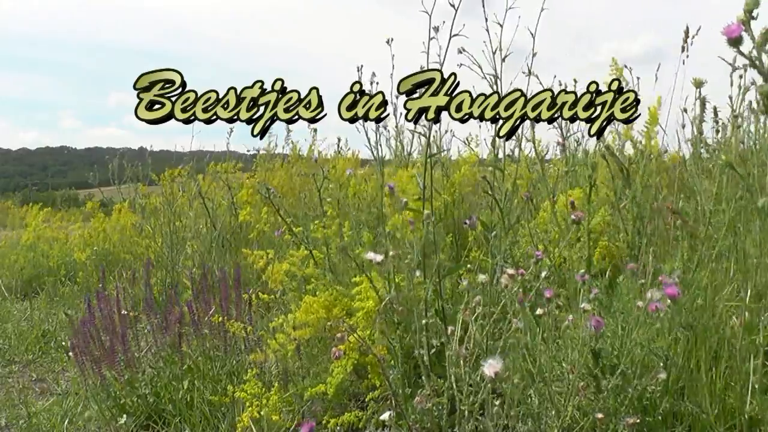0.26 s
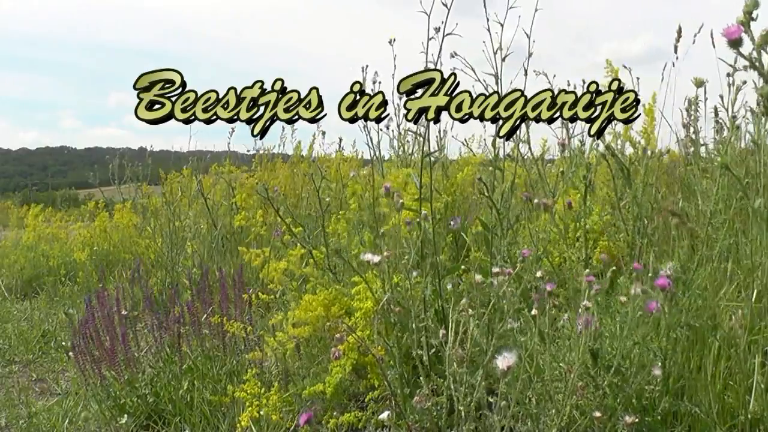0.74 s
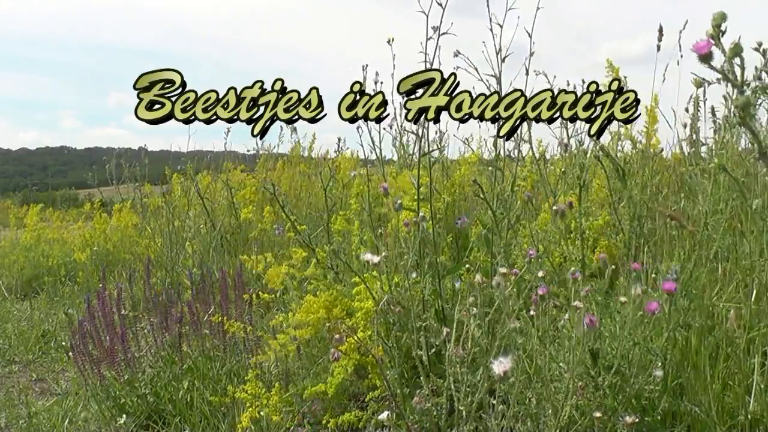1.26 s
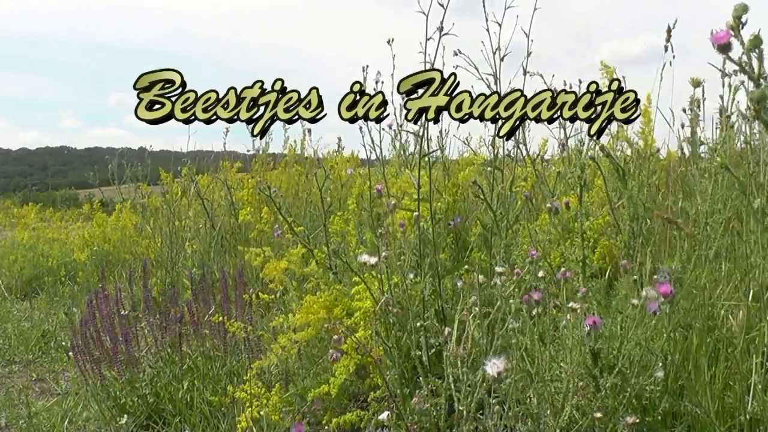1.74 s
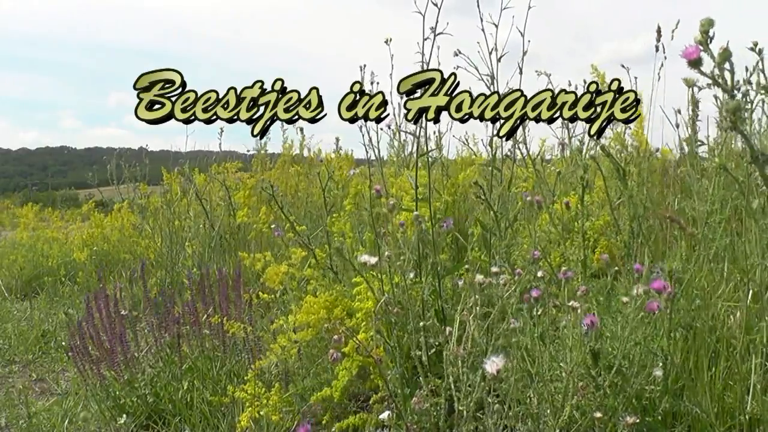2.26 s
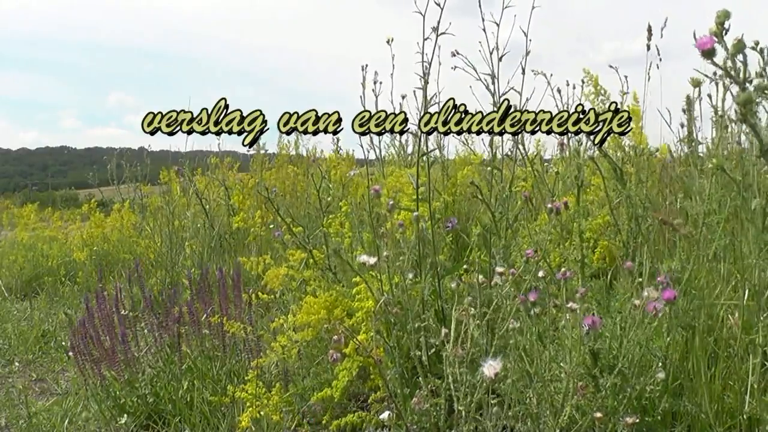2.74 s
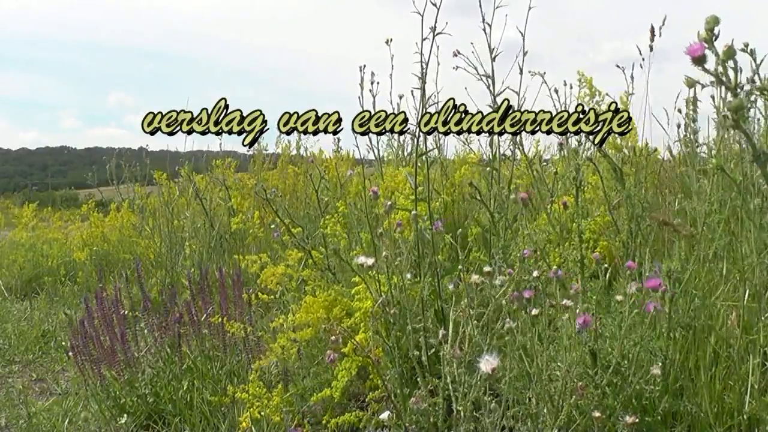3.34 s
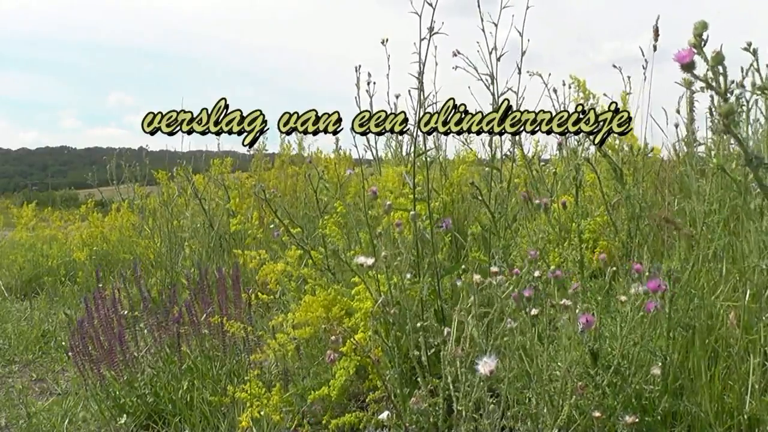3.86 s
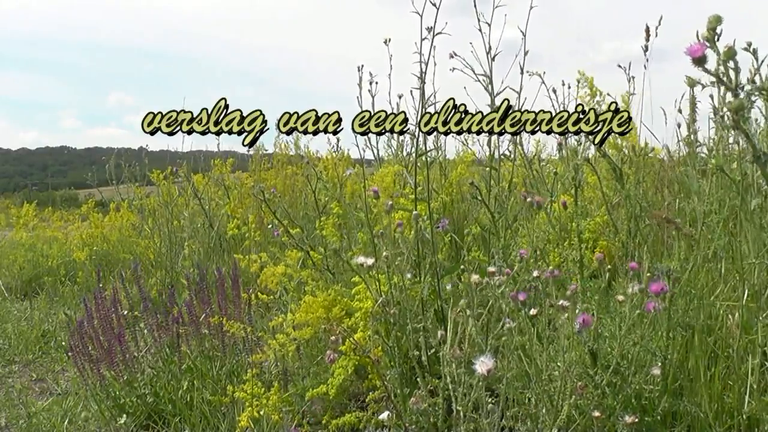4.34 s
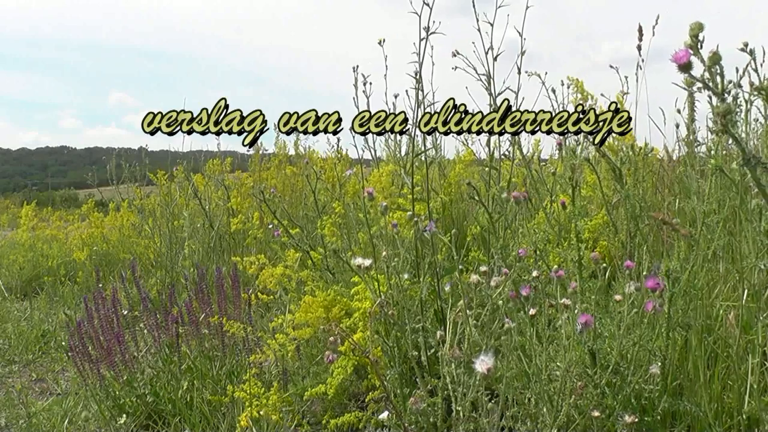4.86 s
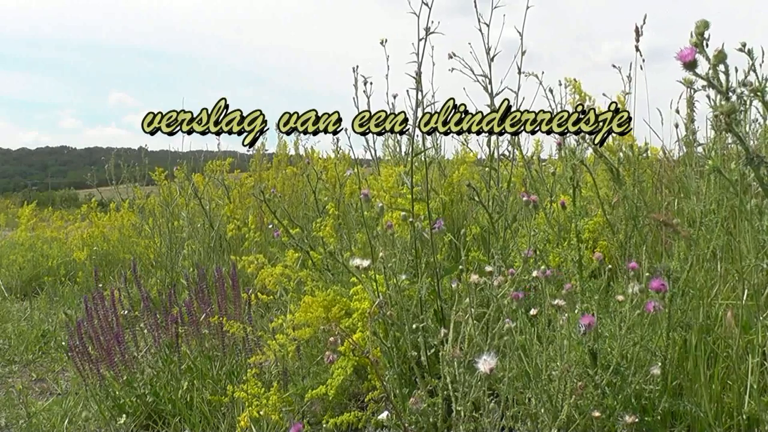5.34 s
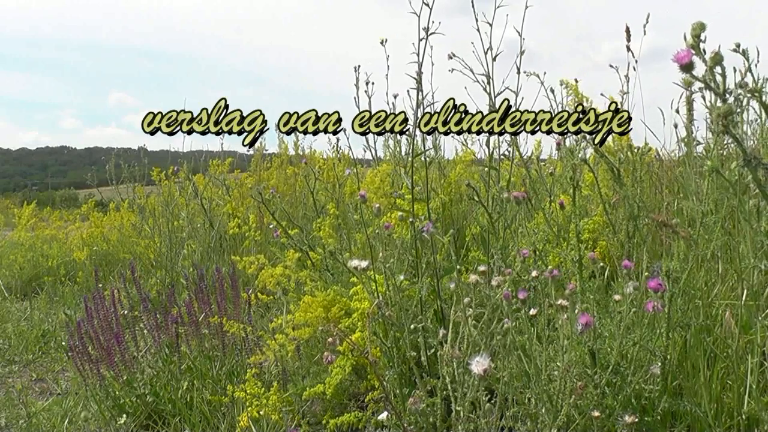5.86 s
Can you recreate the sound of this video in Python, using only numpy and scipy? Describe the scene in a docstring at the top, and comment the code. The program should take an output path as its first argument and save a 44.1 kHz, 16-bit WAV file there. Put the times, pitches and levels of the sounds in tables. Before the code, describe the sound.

A calm open meadow with very soft airy hiss and a blurred far chorus of birds. A turtle dove dominates with frog-like purrs, smooth hoots around 550 Hz pulsing about 28 times a second, each pulse arching in pitch. Purrs run at 0.15-0.7, 1.1-1.7, 2.2-3.0, 3.35-3.9 and 4.3-4.85 seconds; the first is strongest, the third starts low and soft and swells. A soft low gulp falls at 3.0-3.15. A last, far weaker purr runs from 5.4 to 6.07. Behind, a small bird repeats short falling chirps from 0.7 to 1.95, alongside a winding warble and thin whistles. Birds thin out after 2 seconds; quick descending notes come near 3.5-3.9, harsh scolding cheeps at 4.1-4.6, buzzy twits at 5.1-5.35, then faint twittering. Barely audible ticks occur at 0.13 and 2.62. Slight close reflections; all fades by 6.1.

```python
"""Small birds chirp over a blurred far chorus, then a turtle dove purrs six frog-like croaks, the last faint.
A croak is one nearly pure tone swelled into hoots, hurried at first, near 28 a second; each arches in pitch.
A soft gulp of moving partials falls between two croaks. Birds are gliding sines, some buzzy or harsh.
Coloured noise makes the meadow air, decaying steps two faint ticks; all fades at the end."""
import sys
import numpy as np
from scipy import signal
from scipy.io import wavfile
from scipy.ndimage import uniform_filter1d

SR = 44100
rng = np.random.default_rng(int(sys.argv[2]) if len(sys.argv) > 2 else 0)


def store_wav(level_fs):
    """Save 16-bit WAV to argv[1]."""
    pcm = np.round(np.clip(np.atleast_2d(level_fs), -1, 1) * 32767)
    wavfile.write(sys.argv[1], SR, pcm.T.astype(np.int16))


N = 268622
TIME_S = np.arange(N) / SR


def gain_of(db):
    """Decibels to amplitude."""
    return 10 ** (np.asarray(db) / 20)


def evened(x):
    """Scales to rms 1."""
    return x / np.sqrt(np.mean(x ** 2) + 1e-20)


def along(rows, t, axis=1):
    """Reads one column of a curve at the times t."""
    columns = np.transpose(rows)
    return np.interp(t, columns[0], columns[axis])


def read(points, hz):
    """Reads a spectrum on a log-frequency axis."""
    f, value = np.transpose(points)
    return np.interp(np.log(hz + 1), np.log(f + 1), value)


def add(mix, s, sound):
    """Mixes a sound in at time s."""
    part = mix[max(round(s * SR), 0):][:len(sound)]
    part += sound[:len(part)]


def sine(hz):
    """Sine that follows a pitch curve."""
    return np.sin(2 * np.pi * np.cumsum(hz) / SR)


def wander(n, hz):
    """Random drift of rms 1, up to about hz changes a second."""
    return evened(np.interp(np.arange(n) / SR * hz, np.arange(4096), rng.standard_normal(4096)))


def band(x, lo_hz, hi_hz, order=4):
    """Band-pass filter that adds no delay."""
    return signal.sosfiltfilt(signal.butter(order, [lo_hz, hi_hz], "band", fs=SR, output="sos"), x)


def noise(spectrum, patchy_db):
    """Noise of a given colour with drifting patches, rms 1."""
    hz = np.fft.rfftfreq(2048, 1 / SR)
    a, b, patches = rng.standard_normal((3, N // 512 + 5, len(hz)))
    patches = uniform_filter1d(patches, size=7, axis=0)
    patches = evened(uniform_filter1d(patches, size=14, axis=1))
    z = (a + 1j * b) * gain_of(read(spectrum, hz) + patchy_db * patches)
    return evened(signal.istft(z.T, nperseg=2048, noverlap=1536)[1][:N])


# meadow reverberation: f/Hz, t60/s
MEADOW_T60 = [(500, 0.71), (3000, 0.21), (8000, 0.38)]


def meadow(x, onset_s=0.0036):
    """Scatter from plants and far trees: a diffuse tail whose decay time depends on frequency."""
    hz, t, z = signal.stft(rng.standard_normal(SR), SR, nperseg=256)
    decay = gain_of(-60 * t / read(MEADOW_T60, hz)[:, None])
    onset = 1 - np.exp(-t / onset_s)
    tail = signal.istft(z * decay * onset, SR, nperseg=256)[1]
    return signal.fftconvolve(x, tail / np.linalg.norm(tail))[:N]


# hiss colour: f/Hz, relative density/dB per Hz
AIR_COLOUR = [(25, -11), (60, -7.5), (130, -13.5), (250, -2.5), (400, 12.5), (800, 8), (1200, 3.5),
              (1900, -2), (3500, 0.5), (5000, -9), (6500, -21.5), (8500, -27.5), (10000, -36),
              (15000, -37.5)]
# hiss within 1300-2400 Hz: t/s, level/dB
AIR_LEVEL = [(0, -69), (2.1, -69.5), (2.35, -68), (3.1, -72), (3.9, -72.5), (4.5, -71.5), (5.1, -75),
             (5.5, -81.5), (5.85, -88.5), (6.09, -101)]


def air():
    """Soft hiss of the open field, its level set by its middle band."""
    hiss = noise(AIR_COLOUR, patchy_db=2.5)
    middle = signal.sosfilt(signal.butter(4, [1300, 2400], "band", fs=SR, output="sos"), hiss)
    return hiss / middle.std() * gain_of(along(AIR_LEVEL, TIME_S))


# wash colour: f/Hz, relative density/dB per Hz
WASH_COLOUR = [(150, -52), (320, -20.5), (420, -6), (520, 9), (650, -1), (800, -11), (1100, -8.5),
               (1600, -32), (4000, -67)]
# wash: t/s, level/dB
WASH_LEVEL = [(0, -58), (1, -58), (2, -67.5), (3.2, -59.5), (4.1, -59.5), (5, -65), (5.4, -74), (5.8, -72),
              (6.09, -79.5)]


def wash():
    """Low patchy noise under the birds."""
    return noise(WASH_COLOUR, patchy_db=2.5) * gain_of(along(WASH_LEVEL, TIME_S))


# clicks: t/s, peak/dB, thud level/dB
TICK_EVENTS = [(0.127, -40.5, -77), (2.6218, -35, -72)]


def ticks(decay_s=0.00054, thud_s=.014, thud_hz=220):
    """Tiny dry clicks: a sudden step that dies at once, and a soft low thud that peaks after it."""
    out, t = np.zeros(N), np.arange(8192) / SR
    for s, db, thud_db in TICK_EVENTS:
        rumble = evened(band(rng.standard_normal(len(t)), 40, thud_hz, order=2))
        thud = rumble * t / thud_s * np.exp(1 - t / thud_s)
        add(out, s, gain_of(db) * np.exp(-t / decay_s) + gain_of(thud_db) * thud)
    return out


# far chorus: t/s, level/dB
CHORUS_LEVEL = [(0, -61), (0.3, -65), (0.78, -58), (1.25, -58.5), (1.55, -59), (2.15, -58.5), (2.3, -69),
                (2.6, -74), (2.95, -67.5), (3.25, -72), (3.65, -78.5), (3.82, -58.5), (4, -70.5),
                (4.3, -71.5), (5, -70.5), (5.25, -67.5), (5.85, -82.5), (6.09, -89.5)]
# where its notes gather: t/s, f/Hz, spread/octaves
CHORUS_PITCH = [(0, 3570, 0.16), (.45, 3666, 0.23), (.56, 4414, 0.13), (.63, 4366, .14), (.75, 3614, 0.15),
                (.92, 3824, 0.14), (1.06, 3506, .16), (1.25, 3680, 0.11), (1.6, 3502, 0.15),
                (2.1, 3210, 0.16), (2.45, 3466, 0.24), (2.9, 3550, 0.17), (3.05, 4580, .08),
                (3.2, 4464, 0.091), (3.4, 3960, 0.13), (3.8, 3915, 0.13), (4.4, 3950, 0.27),
                (5.3, 3800, 0.24), (6.09, 3930, 0.11)]


def chorus(dry_db=-3, glide_oct=.16, note_s=.05, count=1700, note_spread_db=2.2):
    """Many gliding notes, blurred by distance, swell and sink together; outlying pitches are weaker."""
    out, u = np.zeros(N), np.linspace(-.5, .5, round(note_s * SR))
    for k, (late, high, slope, loud) in enumerate(rng.standard_normal((count, 4))):
        s = (k + late) / count * N / SR
        # sqrt 2 offsets the narrowing by the weaker outliers
        octaves = np.sqrt(2) * along(CHORUS_PITCH, s, axis=2) * high + glide_oct * slope * u
        hz = along(CHORUS_PITCH, s) * 2 ** octaves
        size = gain_of(note_spread_db * loud) * np.exp(-(high / 2) ** 2)
        add(out, s - note_s, size * np.hanning(len(u)) * sine(hz))
    far = meadow(out) + gain_of(dry_db) * out
    far /= np.sqrt(abs(uniform_filter1d(far ** 2, size=6000)) + 1e-9)  # level out before shaping
    return gain_of(along(CHORUS_LEVEL, TIME_S)) * far


def whistle(length_s, start, middle, end, db, buzz, buzz_hz=650, waver_hz=15):
    """A note that glides through three pitches in Hz; a buzzy one shakes fast in pitch."""
    u = np.linspace(0, 1, round(length_s * SR))
    hz = start * (1 - u) * (1 - 2 * u) + middle * (2 * u) * 2 * (1 - u) + end * u * (2 * u - 1)
    hz = hz + buzz_hz * buzz * wander(len(u), 1500) + waver_hz * wander(len(u), 380)
    return gain_of(db) * signal.windows.tukey(len(u), .45) * sine(hz)


# single calls: t/s, length/s, start f/Hz, middle f/Hz, end f/Hz, peak/dB, buzz/0-1
CALLS = [(0.002, 0.058, 4236, 3920, 3500, -58.5, 0.05), (0.06, 0.038, 3590, 3900, 3940, -58, 0),
         (0.202, 0.059, 4230, 3900, 3580, -58.5, 0), (0.43, 0.068, 3400, 3580, 3270, -54, 0.03),
         (0.293, 0.22, 5260, 5170, 5010, -68.5, 0.17), (0.522, 0.07, 4250, 4730, 5060, -60, 0.55),
         (0.548, 0.11, 5200, 5540, 5800, -72, 0.3), (0.588, 0.037, 3000, 3080, 3010, -53, 0.1),
         (0.631, .05, 4550, 4320, 4080, -66.5, 0.2), (0.978, 0.045, 4450, 4500, 4660, -58, 0.13),
         (1.356, 0.046, 3362, 3407, 3680, -50.5, 0.34), (1.608, 0.051, 3530, 3800, 4090, -55.5, 0.18),
         (1.787, 0.045, 4680, 5000, 5270, -66.5, .08), (2.336, 0.024, 3460, 2750, 2620, -51, 0.2),
         (2.76, 0.087, 5350, 4760, 4590, -60.5, 0.03), (2.871, 0.088, 5600, 7100, 5500, -76.5, 0.08),
         (2.876, 0.039, 3620, 3760, 3890, -60.5, 0.03), (2.984, 0.1, 5250, 4690, 4560, -64.5, 0.14),
         (3.594, 0.077, 3580, 3710, 3880, -59, 0.07), (3.947, 0.16, 6160, 6620, 6820, -74.5, 0.12),
         (4.126, .08, 2405, 3230, 3730, -66.5, 0.1), (4.214, 0.057, 2600, 3200, 3930, -61.5, 0.1),
         (4.258, 0.025, 3740, 4020, 4380, -51.5, 0), (4.295, 0.068, 3325, 3170, 3110, -64, 0.05),
         (4.731, 0.13, 3420, 3330, 3340, -63.5, 0.12), (5.455, 0.071, 3560, 3570, 3520, -70.5, 0),
         (4.298, 0.12, 1230, 1290, 1260, -63.5, 0.3), (4.548, 0.15, 1370, 1460, 1400, -66, 0.27),
         (5.707, 0.093, 1133, 1132, 1110, -71, 0.02)]


def calls():
    """Single whistled calls."""
    out = np.zeros(N)
    for s, *note in CALLS:
        add(out, s, whistle(*note))
    return out


# repeats: first t/s, notes, period/s, length/s, start f/Hz, middle f/Hz, end f/Hz,
# first level/dB, last level/dB, buzz/0-1
REPEATED_NOTES = [(0.122, 2, 0.22, 0.036, 4130, 3590, 3350, -55, -57, 0.02),
                  (0.169, 2, 0.26, 0.037, 3475, 3880, 4010, -57.5, -60.5, 0.1),
                  (0.865, 2, 0.34, 0.065, 4130, 4150, 4090, -57, -55, 0.12),
                  (2.112, 2, 0.139, 0.1, 7050, 6350, 4300, -70, -69, 0.05),
                  (2.219, 2, 0.11, 0.07, 1286, 1253, 1070, -61, -64.5, 0),
                  (2.41, 2, 0.09, 0.084, 1100, 1144, 1024, -66.5, -64.5, 0.07),
                  (2.219, 2, 0.083, 0.046, 1680, 1720, 1674, -68, -68, 0.03),
                  (2.74, 2, 0.098, 0.051, 1315, 1305, 1190, -62.5, -67.5, 0.08),
                  (3.487, 4, 0.115, 0.05, 5900, 4400, 3700, -58.5, -59.5, 0.1),
                  (3.724, 2, 0.2, 0.16, 8100, 8080, 7950, -81, -79, 0.25),
                  (4.765, 2, 0.16, 0.02, 4680, 5600, 6700, -70, -69.5, 0),
                  (5.408, 3, 0.194, 0.095, 4110, 4070, 4110, -70.5, -70, 0.02),
                  (5.487, 3, 0.206, 0.055, 3850, 3330, 2900, -69.5, -74, 0.13),
                  (5.578, 7, 0.0725, 0.03, 5650, 4850, 4000, -72.5, -82, 0.08)]


def phrases(stray=0.007):
    """Repeated whistles that swell or fade and stray a little in pitch."""
    out = np.zeros(N)
    for first, notes, period, length, start, middle, end, first_db, last_db, buzz in REPEATED_NOTES:
        for k, db in enumerate(np.linspace(first_db, last_db, round(notes))):
            glide = np.array([start, middle, end]) * (1 + stray * rng.standard_normal())
            add(out, first + k * period, whistle(length, *glide, db, buzz))
    return out


# falling notes: middle t/s, length/s, level/dB, f/Hz, glide/Hz per s
FALLING_NOTES = [(0.739, .032, -54, 2940, -9000), (0.877, 0.039, -54.5, 2904, -8000),
                 (1.012, 0.028, -51.5, 2840, -9000), (1.152, .042, -50.5, 2814, -11000),
                 (1.286, 0.043, -48.5, 2860, -7000), (1.415, 0.042, -50.5, 2840, -9000),
                 (1.544, .046, -48.5, 2850, -7000), (1.678, 0.038, -47.5, 2850, -7000),
                 (1.8, 0.044, -47, 2820, -6000), (1.94, 0.052, -47, 2873, -3000)]


def slurs(buzz=.06):
    """One bird repeats a short falling note that tends to grow longer, louder and flatter."""
    out = np.zeros(N)
    for s, length, db, hz, slope in FALLING_NOTES:
        fall = slope * length / 2
        add(out, s - length / 2, whistle(length, hz - fall, hz, hz + fall, db, buzz))
    return out


# scolding cheeps: t/s, length/s, level/dB, harshness/0-1
SCOLDS = [(4.121, 0.065, -67.5, 0.77), (4.21, 0.059, -65.5, 0.7), (4.314, 0.052, -65.5, 0.83),
          (4.4, .06, -67.5, 0.84), (4.507, 0.051, -66, .9), (4.579, .045, -68.5, 0.9)]
# fundamental: start f/Hz, end f/Hz
SCOLD_HZ = (842, 1016)
# partials without harshness: multiple, level/dB
SCOLD_PARTIALS = [(3, -9), (4, -5.5), (5, -12), (6, -10.5), (7, -11)]


def cheeps(shake=0.09, flatten=0.96, top_hz=6800, grain_db=5, grains_per_s=450):
    """A scolding bird: rising stacks of partials that break up; harsh ones shake and turn brighter."""
    out = np.zeros(N)
    for s, length, db, harsh in SCOLDS:
        n = round(length * SR)
        hz = np.geomspace(*SCOLD_HZ, n) * (1 + shake * harsh * wander(n, 1200))
        angle = 2 * np.pi * np.cumsum(hz) / SR
        envelope = gain_of(db) * signal.windows.tukey(n, .45)
        for k, level in SCOLD_PARTIALS:
            grain = evened(gain_of(grain_db * wander(n, grains_per_s)))
            rolloff = 1 + (k * hz / top_hz) ** 20
            size = gain_of(level * (1.0 - flatten * harsh)) * grain / rolloff
            add(out, s, envelope * size * np.sin(round(k) * angle))
    return out


# two-voiced cheeps: t/s, level/dB
TWIT_EVENTS = [(5.111, -59.5), (5.223, -61.5), (5.34, -63)]
# low voice, high voice: t from start/s, f/Hz, relative level/dB
SYRINX_VOICES = [
    [(0, 1800, -12), (.008, 2450, -3), (.022, 2700, -1), (.031, 4200, 0), (.037, 4750, 1), (.045, 3800, -6)],
    [(0, 2650, -9), (.008, 3350, 0), (.018, 3800, 2), (.024, 4800, -5)],
]


def twits(mixing_db=-13, hiss_db=-10, shake=.035):
    """Both sides of the syrinx glide upward, mixing into sum and difference tones over harsh hiss."""
    out, t = np.zeros(N), np.arange(0, SYRINX_VOICES[0][-1][0], 1 / SR)
    for s, db in TWIT_EVENTS:
        voices = []
        for curve in SYRINX_VOICES:
            ramps = np.clip(np.minimum(t, curve[-1][0] - t) * 500, 0, 1)  # 2 ms in and out
            hz = along(curve, t) * (1 + shake * wander(len(t), 1500))
            voices.append(gain_of(along(curve, t, axis=2)) * ramps * sine(hz))
        low, high = voices
        hiss = evened(band(rng.standard_normal(len(t)), 2800, 7000, order=3))
        hiss = hiss * signal.windows.tukey(len(t), .5)
        add(out, s, gain_of(db) * (low + high + gain_of(mixing_db) * (2 * low * high) + gain_of(hiss_db) * hiss))
    return out


# winding note: t/s, f/Hz, level/dB
WARBLE_CURVE = [(.65, 4400, -66), (.7, 3850, -59.5), (.745, 3500, -54.5), (.775, 3130, -55),
                (.82, 3270, -55.5), (.852, 3520, -51), (0.884, 4130, -55), (0.936, 3900, -58),
                (.985, 3520, -58), (1.03, 3180, -54), (1.091, 3480, -60), (1.165, 3420, -53),
                (1.215, 3900, -52), (1.26, 4030, -52), (1.301, 3700, -62), (1.34, 3200, -61.5),
                (1.4, 3600, -56.5), (1.449, 3900, -62)]


def warble(buzz_hz=170, buzzes_per_s=420, flutter_db=3.0, flutters_per_s=140):
    """One long winding note that shakes fast in pitch and flutters in strength."""
    out, t = np.zeros(N), np.arange(WARBLE_CURVE[0][0], WARBLE_CURVE[-1][0], 1 / SR)
    hz = along(WARBLE_CURVE, t) + buzz_hz * wander(len(t), buzzes_per_s)
    flutter = evened(gain_of(flutter_db * wander(len(t), flutters_per_s)))
    size = gain_of(along(WARBLE_CURVE, t, axis=2)) * flutter
    add(out, t[0], size * signal.windows.tukey(len(t), .05) * sine(hz))
    return out


def small_birds(wet_db=-6):
    """The birds of the meadow, mostly near small ones plus a few faint low calls from farther off, with the
    meadow's tail."""
    out = slurs() + cheeps() + twits() + warble() + phrases() + calls()
    return out + gain_of(wet_db) * meadow(out)


# gulp: t/s, f/Hz, level/dB
GULP_CURVE = [(3.012, 199.5, -59), (3.033, 202, -47), (3.069, 210, -47.5), (3.11, 204, -40.5),
              (3.135, 194, -45.5), (3.165, 174, -67)]
# its partials: multiple, start level/dB, end level/dB (relative)
GULP_WEIGHTS = [(2, -8, -28), (3, 8, -15), (4, -13, 3), (5, -47.5, -19)]


def gulp():
    """A soft, low note whose weight moves from the third partial to the fourth."""
    out, t = np.zeros(N), np.arange(GULP_CURVE[0][0], GULP_CURVE[-1][0], 1 / SR)
    angle = 2 * np.pi * np.cumsum(along(GULP_CURVE, t)) / SR
    note = np.zeros(len(t))
    for k, first_db, last_db in GULP_WEIGHTS:
        note += gain_of(np.linspace(first_db, last_db, len(t))) * np.sin(round(k) * angle)
    level = gain_of(along(GULP_CURVE, t, axis=2))
    add(out, t[0], level * evened(note) * signal.windows.tukey(len(t), .15))
    return out


def rasp(voice, level_db=-48.5, follow=1.0, lo_hz=590, hi_hz=690, skirt_db=-7, octave_db=-17):
    """Turbulence just above the hoot and around its octave, throbbing with it."""
    push = uniform_filter1d(abs(signal.hilbert(voice)), size=700)
    flow = rng.standard_normal(N)
    colour = evened(band(flow, lo_hz, hi_hz, order=3))
    colour += gain_of(skirt_db) * evened(band(flow, 690, 876, order=3))
    colour += gain_of(octave_db) * evened(band(flow, 990, 1200, order=2))
    return gain_of(level_db) * abs(push / push.max()) ** follow * colour


def hum(length_s, hz, db):
    """A soft pure tone that swells and dies."""
    t = np.arange(0, length_s, 1 / SR)
    return gain_of(db) * np.sin(np.pi * t / length_s) * np.sin(2 * np.pi * hz * t)


def pulse_times(first, last, hurry, settle, pulses_per_s=28.4):
    """The gaps between pulses start short and relax toward a steady length."""
    gaps = 1 - hurry * np.exp(-np.arange(round((last - first) * pulses_per_s)) / settle)
    return first + (last - first) * np.append(0, np.cumsum(gaps)) / gaps.sum()


# croaks: first pulse t/s, last pulse t/s, first gap shortening/share, settling/pulses,
# relative hoot length, opening hum level/dB, closing hum level/dB
CROAK_RUNS = [(0.149, 0.718, 0.063, 2.5, 1.06, -37, -60), (1.1071, 1.663, 0.13, 2.7, 1.013, -38.5, -41),
              (2.2249, 2.9767, 0.29, 38, 0.86, -44.5, -60.5),
              (3.353, 3.885, 0.056, 1.1, 1.04, -36.5, -57.5), (4.282, 4.836, 0.165, 2.9, 1.024, -40, -41),
              (5.395, 6.073, 0.11, 17.5, 0.85, -57, -70)]
# effort, one curve per croak: t/s, peak level/dB, top f/Hz
CROAK_EFFORT = [
    [(.15, -19, 578), (.185, -18, 569.8), (.29, -18.5, 556.3), (.54, -19.5, 549.7), (.68, -22.5, 530.6),
     (.718, -28, 474)],
    [(1.107, -18.5, 582), (1.138, -18, 584.2), (1.18, -18.5, 570.2), (1.38, -21.5, 541.4), (1.53, -24, 514),
     (1.628, -25, 512), (1.665, -28, 486)],
    [(2.225, -28.5, 473.4), (2.36, -27, 499), (2.5, -22, 541), (2.71, -21.5, 543), (2.86, -22.5, 538),
     (2.975, -24.5, 518.3)],
    [(3.35, -21, 584.3), (3.39, -19.8, 582.3), (3.48, -22, 560.1), (3.6, -21.5, 563), (3.78, -23, 561.2),
     (3.885, -26, 523)],
    [(4.283, -21, 596.3), (4.315, -21, 606.7), (4.35, -21.5, 573.2), (4.44, -22, 570.5), (4.62, -26, 508.4),
     (4.76, -28.5, 511), (4.835, -31.5, 497)],
    [(5.395, -39, 478), (5.43, -37.5, 487.3), (5.5, -39.5, 483.7), (5.61, -37.5, 553), (5.72, -37.5, 556),
     (5.93, -42.5, 550.7), (6.075, -53, 547)],
]
# one pulse: t from peak/s, amplitude/0-1
PULSE_SWELL = [(-.012, .09), (-.0075, .06), (-.003, .82), (.001, .98), (.005, .76), (.009, .2), (.014, .05),
               (.021, .16)]
# its pitch: t from peak/s, share of the way from rest to top pitch
PULSE_ARCH = [(-.012, -1.5), (-.007, .75), (.001, .87), (.005, .88), (.009, -.04), (.021, .18)]
# opening hums, low and high: lead before first pulse/s, length/s, f/Hz, relative level/dB
OPENING_HUMS = [(.038, .038, 458, 0), (.031, .026, 643, -2.5)]
# closing hum: delay after last pulse/s, length/s, f/Hz
CLOSING_HUM = (.015, .032, 468)
REST_HZ, SLIP_TURNS = 458.2, .07
RELEASE_S, CUT_OFF_S = .006, .017
# brief upper note ahead of a hoot; level relative to it when tense, plus a rise per step of slackness
UPPER_LEAD_S, UPPER_S, UPPER_HZ = .024, 0.018, 628
UPPER_DB, UPPER_SLACK_DB = -25, 8.5


def croaks(overtone_db=-56, slack=0.0065, tense_hz=555, round_s=0.0038, soften=0.23,
           mean_rest_hz=456, mean_share=0.78, uneven_db=0.5, uneven_hz=3):
    """A nearly pure tone runs through each croak; puffs of air swell it into hoots and lift its pitch."""
    out, t = np.zeros(N), np.arange(-.018, .03, 1 / SR)
    for (*run, stretch, opening_db, closing_db), effort in zip(CROAK_RUNS, CROAK_EFFORT):
        times = pulse_times(*run)
        mean_hz = mean_rest_hz + mean_share * (along(effort, TIME_S, axis=2) - mean_rest_hz)
        running = np.cumsum(mean_hz) / SR
        for s, (louder, higher, slip) in zip(times, rng.standard_normal((len(times), 3))):
            db = along(effort, s) + uneven_db * louder
            top_hz = along(effort, s, axis=2) + uneven_hz * higher
            # low, slack pulses have softer, more rounded swells
            loose = (tense_hz - top_hz) / 50
            own_t = t / (stretch + slack * loose)
            rounding = round(SR * round_s * np.exp(soften * loose))
            swell = uniform_filter1d(along(PULSE_SWELL, own_t), rounding)
            swell = swell * signal.windows.tukey(len(t), .1)
            if s == times[-1]:  # the air stops short after the last hoot
                swell = swell * np.clip((CUT_OFF_S - t) / RELEASE_S, 0, 1)
            turns = np.cumsum(REST_HZ + (top_hz - REST_HZ) * along(PULSE_ARCH, own_t)) / SR
            # the tone swings on between hoots, slipping a little
            phase = running[round(s * SR)] + SLIP_TURNS * slip
            angle = 2 * np.pi * (turns - np.interp(0, t, turns) + phase)
            hoot = np.cos(angle) + gain_of(overtone_db) * np.cos(2 * angle)
            add(out, s + t[0], gain_of(db) * swell * hoot)
            if s > times[0]:
                upper_db = db + UPPER_DB + UPPER_SLACK_DB * loose
                add(out, s - UPPER_LEAD_S, hum(UPPER_S, UPPER_HZ, upper_db))
        for lead, length, hz, db in OPENING_HUMS:
            add(out, times[0] - lead, hum(length, hz, opening_db + db))
        add(out, times[-1] + CLOSING_HUM[0], hum(*CLOSING_HUM[1:], closing_db))
    return out


# close reflections: delay/s, gain
CLOSE_ECHOES = [(.00655, 0.15), (.00991, 0.27), (0.0215, .06)]


def dove(wet_db=-28, trees_db=-26, trees_s=.14, lowest_hz=385):
    """Croaks and gulp; the croaks get close reflections, a meadow tail and a late echo from the trees."""
    voice = croaks()
    voice = band(voice + rasp(voice), lowest_hz, 1900, order=6)  # small swollen throat radiates no bass
    out = voice + gulp()
    for delay, gain in CLOSE_ECHOES:
        add(out, delay, gain * voice)
    add(out, trees_s, gain_of(trees_db) * meadow(voice))
    return out + gain_of(wet_db) * meadow(voice)


def scene():
    """Everything heard from one spot in the meadow."""
    return (air() + wash() + ticks() + chorus() + small_birds() + dove())[None]


def record(dry, edge_hz=15700):
    """The band limit of the recorder."""
    lowpass = signal.firwin(511, edge_hz, window=("kaiser", 9), fs=SR)
    return signal.oaconvolve(dry, lowpass[None], "same")


dry = scene()
out = record(dry)
store_wav(out)
```